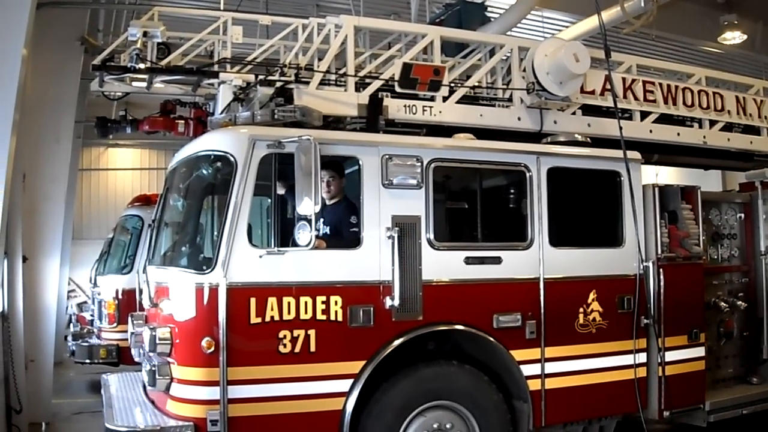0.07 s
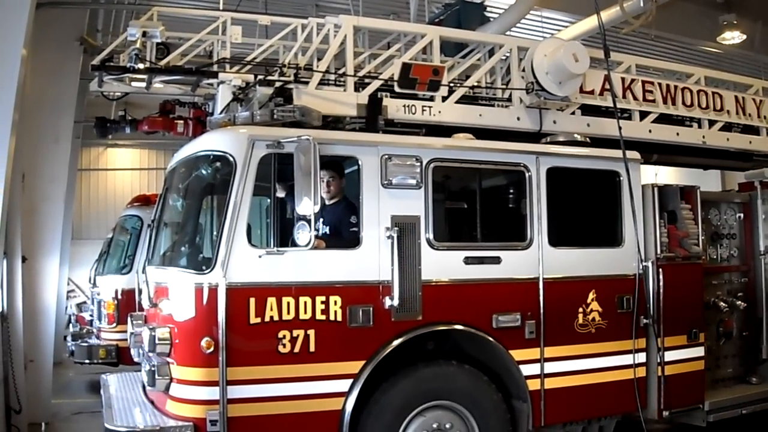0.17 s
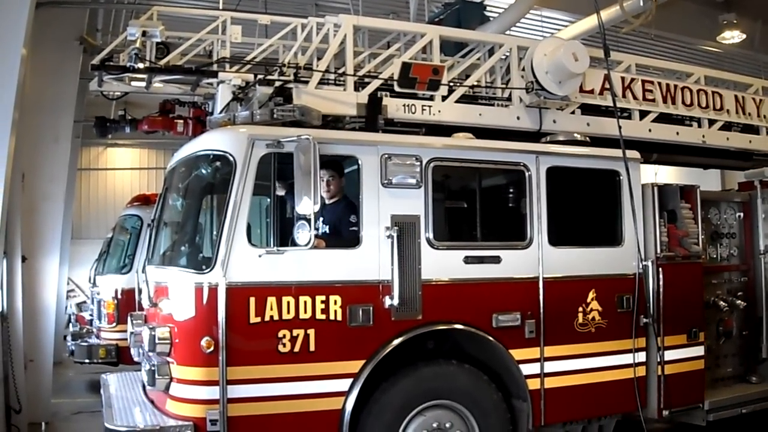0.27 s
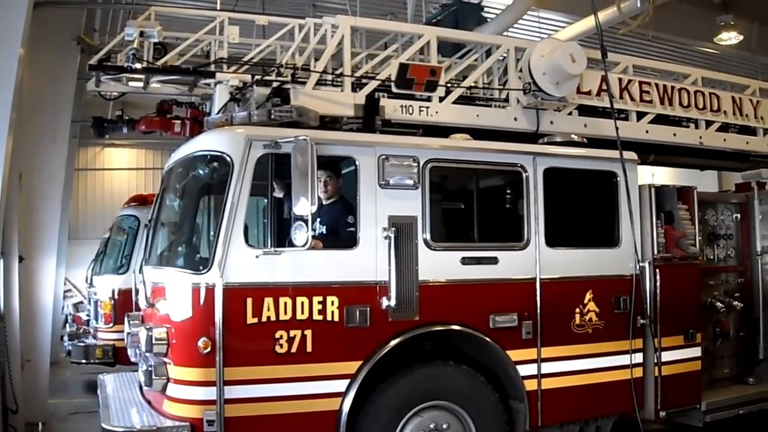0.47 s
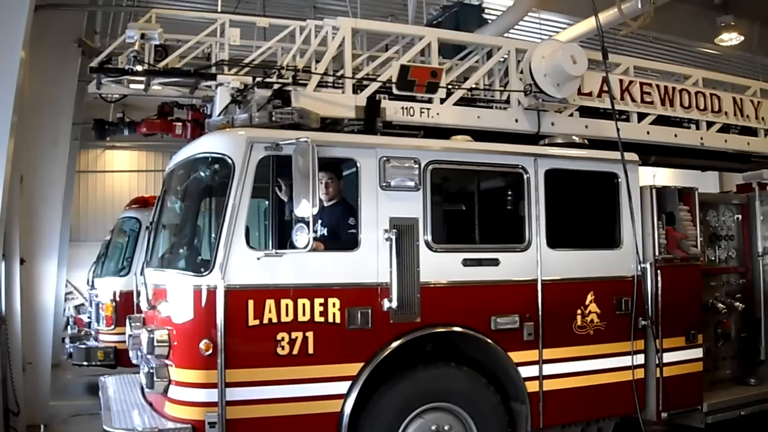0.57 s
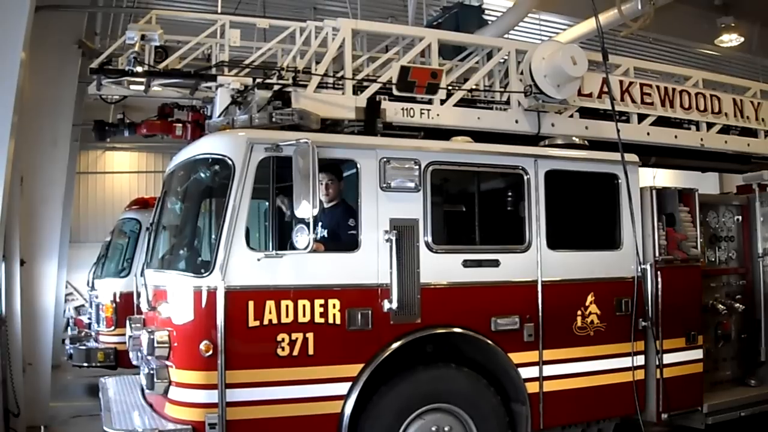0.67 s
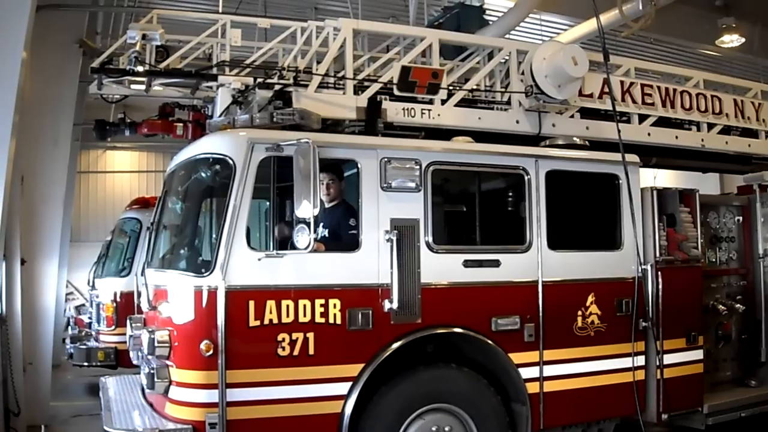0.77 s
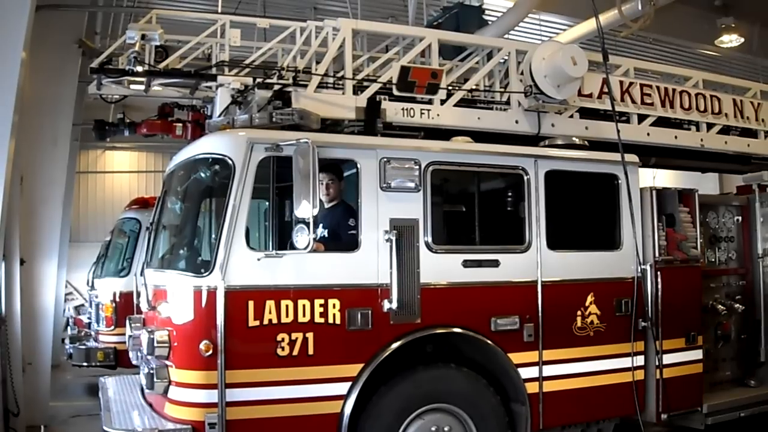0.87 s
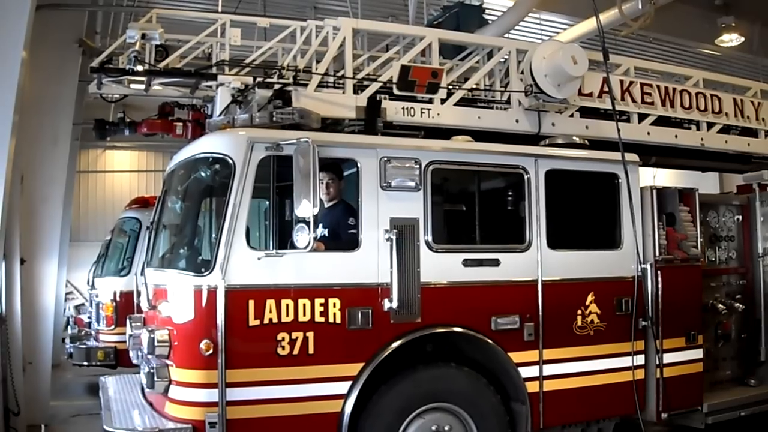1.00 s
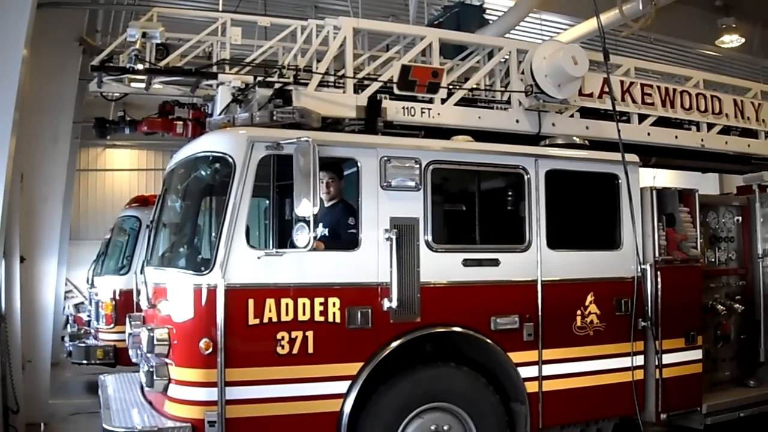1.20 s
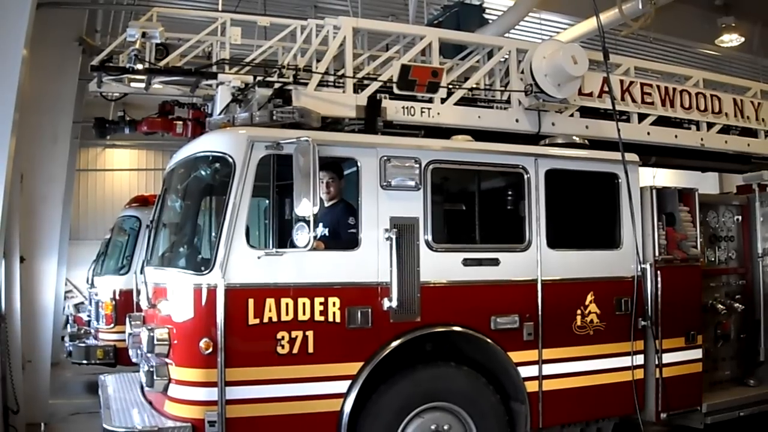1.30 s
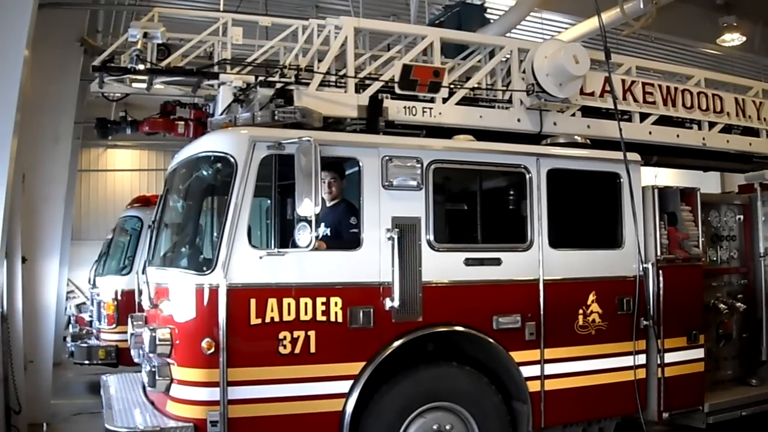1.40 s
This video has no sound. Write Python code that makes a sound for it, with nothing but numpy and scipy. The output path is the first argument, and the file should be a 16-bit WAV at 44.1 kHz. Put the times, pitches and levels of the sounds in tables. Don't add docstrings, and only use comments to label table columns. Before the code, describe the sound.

After a moment of hissy quiet, one abrupt truck air horn blast bursts out, high squeal turning to coarse low buzz with rushing air, then fades as dense echoes in a hard bay, distorted by a small camera microphone.

```python
import sys
import numpy as np
from scipy import signal
from scipy.fft import rfft, irfft
from scipy.io import wavfile
from scipy.ndimage import uniform_filter1d

SR = 44100
rng = np.random.default_rng(int(sys.argv[2]) if len(sys.argv) > 2 else 0)


def dump(signal):
    limited = np.clip(np.atleast_2d(signal).T, -1, 1)
    pcm = np.round(limited * 32767).astype(np.int16)
    wavfile.write(sys.argv[1], SR, pcm)


def volts_from_decibels(level):
    exponent = np.asarray(level, float) / 20
    return 10 ** exponent


N = 63945

ATTACK_S, STOP_S, RELEASE_S = 0.012, 0.52, 0.05
LOCK_S, LOCK_RISE_S = 0.1975, 0.044


def since(start_s):
    return np.maximum(np.arange(N) / SR - start_s, 0)


def noise():
    return rng.standard_normal(N)


def level(x, db):
    return x * volts_from_decibels(db) / np.sqrt(np.mean(x ** 2))


def table(hz, rows):
    rows = np.array(rows, float)
    return np.interp(np.log(np.maximum(hz, 1)), np.log(rows[:, 0]), rows[:, 1])


def colour(x, rows):
    hz = np.arange(len(x) // 2 + 1) * SR / len(x)
    return irfft(rfft(x) * volts_from_decibels(table(hz, rows)), len(x))


def walk(rate_hz):
    k = int(SR / rate_hz)
    drift = uniform_filter1d(uniform_filter1d(noise(), k), k)
    return drift / drift.std()


def gate(start_s, rise_s):
    opening = np.sin(np.pi / 2 * np.minimum(since(start_s) / rise_s, 1)) ** 2
    return opening * np.exp(-since(STOP_S) / RELEASE_S)


def sing(pitch_hz, flutter_db=4.5):
    wavering_hz = pitch_hz * (1 + 0.01077 * walk(58.64))
    phase = 2 * np.pi * (np.cumsum(wavering_hz) / SR + rng.random())
    return np.sqrt(2) * volts_from_decibels(flutter_db * walk(25.7)) * np.sin(phase)


def flare(start_s, pitch_hz, level_db, length_s):
    swell = np.minimum(since(start_s) / ATTACK_S, 1) ** 2
    let_go = np.clip(1 - since(start_s + length_s - ATTACK_S) / ATTACK_S / 2, 0, 1)
    return volts_from_decibels(level_db) * swell * let_go * sing(pitch_hz, flutter_db=1.37)


# start_s, pitch_hz, level_db, length_s
FLARES = [(.195, 935, -3, .075), (.196, 1660, -7, .022), (.2, 750, -14, .04), (.238, 1680, -10, .025),
          (.252, 2200, -9, .035), (.265, 1820, -11, .03), (.265, 1430, -11, .035), (.295, 724, -8, .1),
          (.362, 930, -3, .04), (.418, 2200, -7, .045), (.415, 1430, -9, .045), (.44, 932, -9, .07),
          (.42, 724, -10, .16)]


def squeal():
    return sum(flare(*row) for row in FLARES)


# pitch_hz, level_db
COLUMN_NOTES = [(407, -31), (517, -31), (608, -28), (724, -24), (818, -25.5), (930, -34), (1006, -28),
                (1125, -28), (1228, -24.5), (1425, -31.5), (1615, -27), (1815, -29.5), (2015, -35.5),
                (2195, -44)]


def singing_column():
    return level(sum(volts_from_decibels(db) * sing(hz) for hz, db in COLUMN_NOTES), -9.5)


def low_beat():
    start_s, fade_t60_s = 0.375, 0.9
    loudness = volts_from_decibels(-26 - 60 * since(STOP_S) / fade_t60_s)
    return loudness * sing(203) * np.minimum(since(start_s) / LOCK_RISE_S, 1)


# time_s, pitch_hz, pressure_db
DIAPHRAGM = [
    (0.202, 103.9, -2),
    (0.259, 104.3, 6.5),
    (0.329, 102.4, 2),
    (0.371, 102.9, -1.5),
    (.41, 103, 6),
    (.5, 102.1, 0.5),
]
# pitch_hz, level_db
BELL_TONE = [(100, -42), (400, -14), (700, -6), (1000, 2), (2200, 0), (4000, -6), (8000, -21),
             (16000, -31.5)]


def buzzing_diaphragm():
    jitter, shimmer_db = 0.011, 1.5
    puff_fade = 1.95
    time_s, pitch_hz, pressure_db = np.array(DIAPHRAGM).T
    t = since(0)
    phase = np.cumsum(np.interp(t, time_s, pitch_hz) * (1 + jitter * walk(120))) / SR
    slaps = np.diff(np.floor(phase), prepend=0) * volts_from_decibels(shimmer_db * noise())
    slaps = level(colour(slaps, BELL_TONE), -14.5)
    puffs = np.exp(-(phase % 1) / puff_fade) * noise()
    air = level(colour(puffs, BELL_TONE), -10)
    buzz = (singing_column() + slaps) * gate(LOCK_S, LOCK_RISE_S)
    rush = air * gate(LOCK_S, ATTACK_S)
    return (buzz + rush) * volts_from_decibels(np.interp(t, time_s, pressure_db))


# pitch_hz, t60_s
BAY_RING = [(100, 0.79), (200, 1.3), (330, 1.43), (720, 1.89), (1500, 1.96), (3000, 1.643), (6000, 1.005),
            (12000, 0.41)]


def bay(x):
    gap_s, build_s, bass_cut_hz = 0.014, 0.012, 583
    hz = np.arange(N // 2 + 1) * SR / N
    spectrum = rfft(noise())
    echo = 0
    for centre_hz in 62.5 * 2 ** (np.arange(18) / 2):
        octaves_away = np.abs(np.log2(np.maximum(hz, 1) / centre_hz))
        band = irfft(spectrum * np.clip(1 - 2 * octaves_away, 0, 1), N)
        echo = echo + band * np.exp(-np.log(1000) * since(0) / table(centre_hz, BAY_RING))
    echo = echo * np.minimum(since(gap_s) / build_s, 1)
    echo = echo * volts_from_decibels(-8.5) / np.sqrt(np.sum(echo ** 2))
    x = signal.sosfilt(signal.butter(1, bass_cut_hz, "highpass", fs=SR, output="sos"), x)
    return signal.fftconvolve(x, echo)[:N]


# pitch_hz, level_db (per Hz)
HISS_TONE = [(30, -32), (150, -8), (350, -3), (900, 0.5), (2000, -10), (4000, -16), (8000, -32.5),
             (16000, -53)]


def hiss():
    return level(colour(noise(), HISS_TONE), -36) * volts_from_decibels(1.73 * walk(3.7))


# pitch_hz, width_hz, level_db
WHINE_BANDS = [(2630, 270, -46), (4880, 400, -50), (6720, 200, -65), (7850, 400, -59), (10100, 700, -64)]


def motor_whine():
    whine = 0
    for hz, width_hz, db in WHINE_BANDS:
        resonance = signal.iirpeak(hz, hz / width_hz, SR)
        whine = whine + level(signal.lfilter(*resonance, noise()), db)
    return whine


# multiple (of the base pitch), level_db
HUM_OVERTONES = [(1, -43.5), (2, -52), (3, -67), (4, -59.5)]


def hum():
    base_hz = 29.7
    return sum(np.sqrt(2) * volts_from_decibels(db) * np.sin(2 * np.pi * multiple * base_hz * since(0) + multiple)
               for multiple, db in HUM_OVERTONES)


def scene():
    high = squeal()
    body = buzzing_diaphragm() + low_beat()
    echoes = bay(volts_from_decibels(-3.5) * high + body)
    return (high + body + echoes + hiss() + motor_whine() + hum())[None]


def band_limit(x):
    return signal.sosfilt(signal.butter(12, 16390, fs=SR, output="sos"), x)


def record(dry):
    ceiling, knee = 0.51, 9.5
    x = dry / (1 + np.abs(dry / ceiling) ** knee) ** (1 / knee)
    x = signal.sosfilt(signal.butter(1, [25, 14300], "bandpass", fs=SR, output="sos"), x)
    x = signal.sosfilt(signal.ellip(8, 0.2, 60, 15750, fs=SR, output="sos"), x)
    return band_limit(x)


dry = scene()
out = record(dry)
dump(out)
```